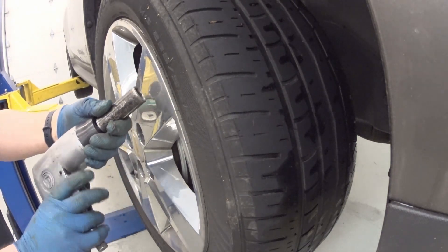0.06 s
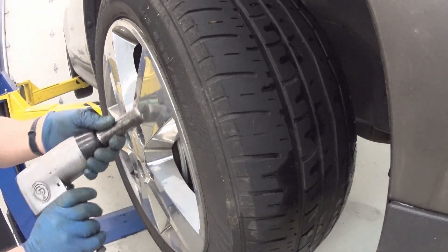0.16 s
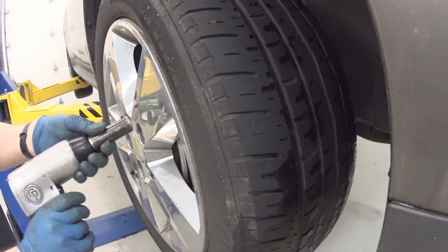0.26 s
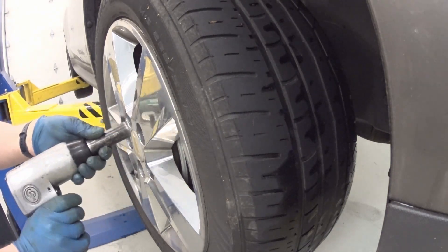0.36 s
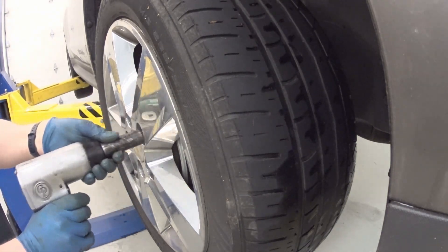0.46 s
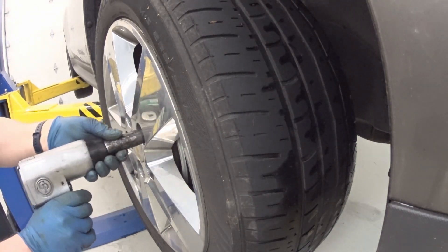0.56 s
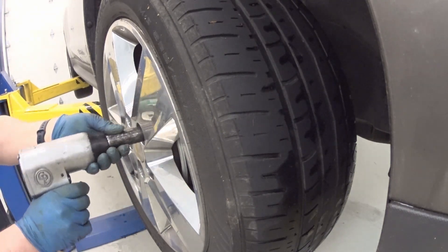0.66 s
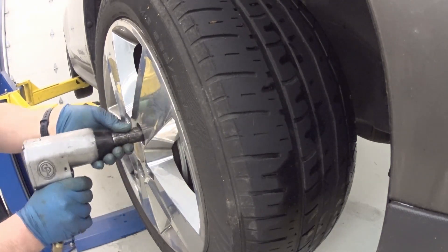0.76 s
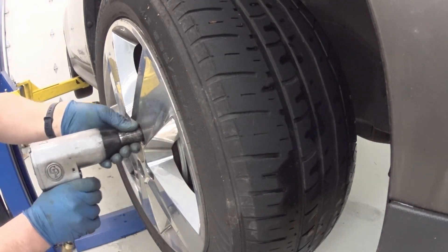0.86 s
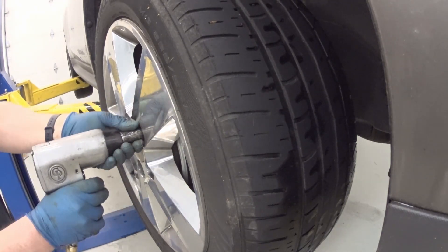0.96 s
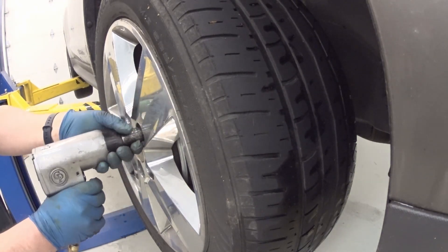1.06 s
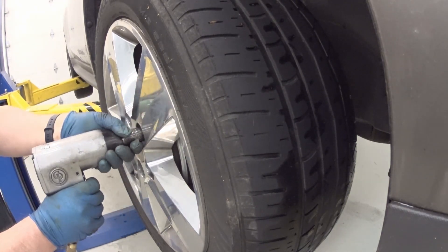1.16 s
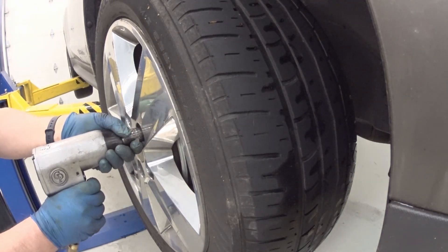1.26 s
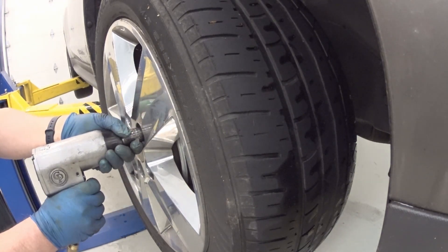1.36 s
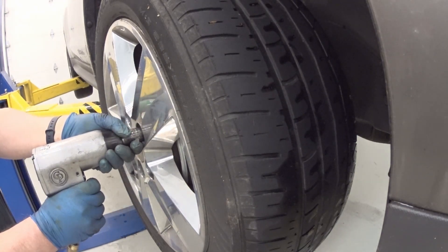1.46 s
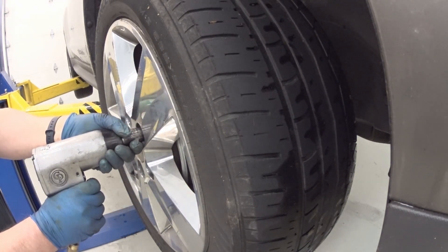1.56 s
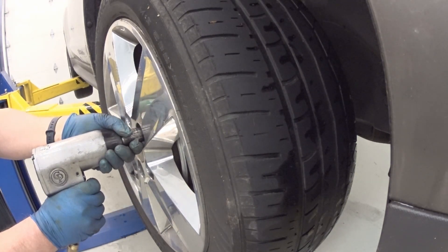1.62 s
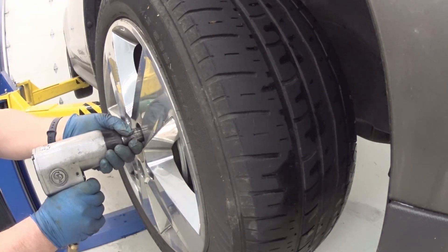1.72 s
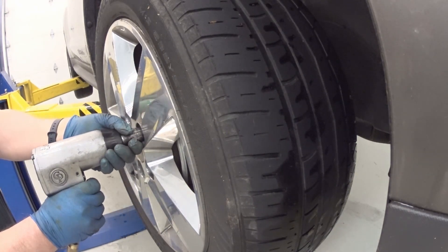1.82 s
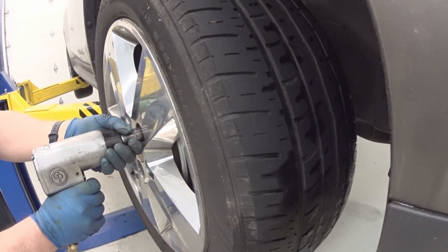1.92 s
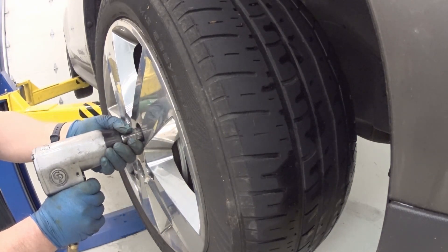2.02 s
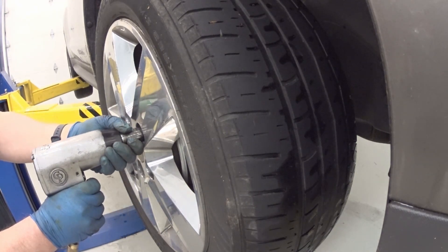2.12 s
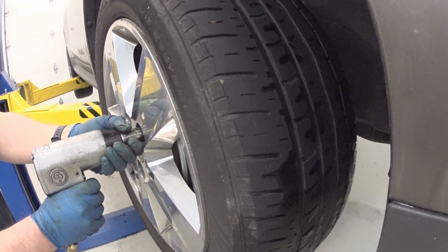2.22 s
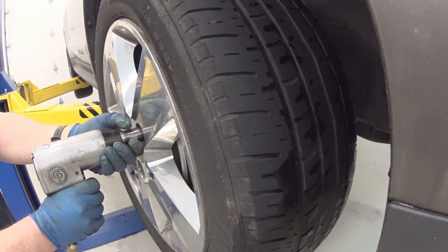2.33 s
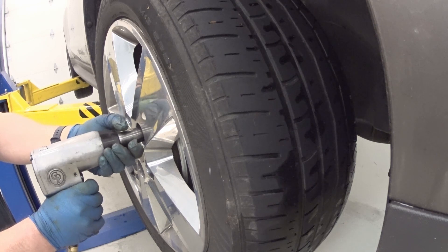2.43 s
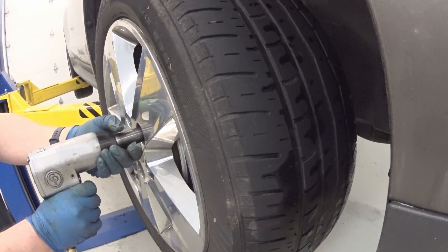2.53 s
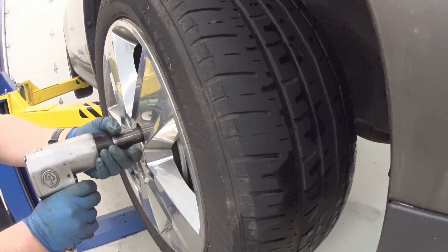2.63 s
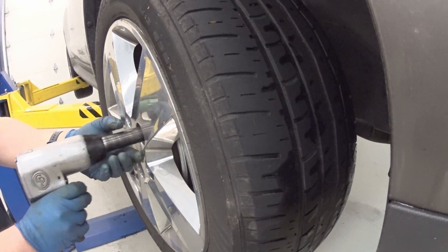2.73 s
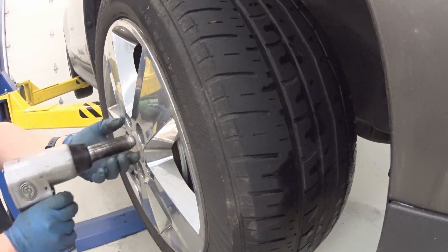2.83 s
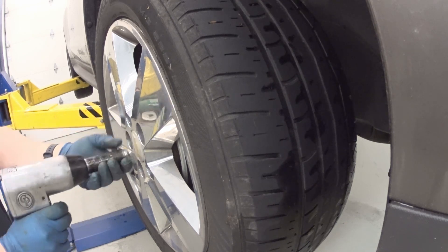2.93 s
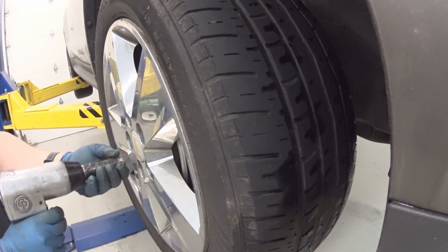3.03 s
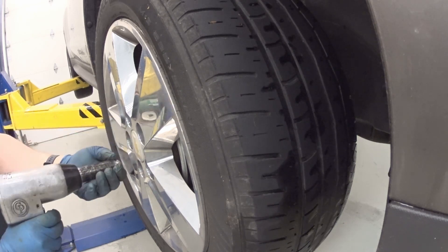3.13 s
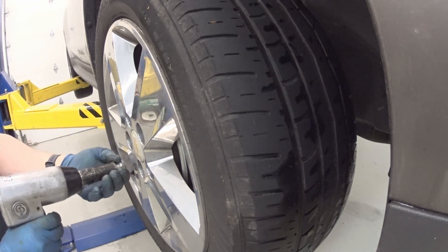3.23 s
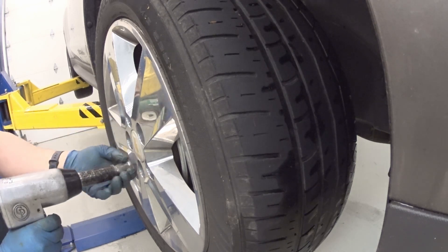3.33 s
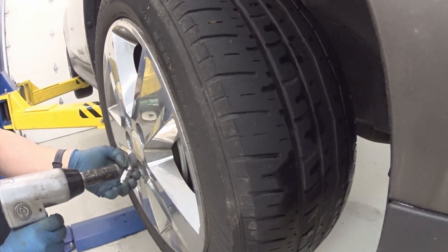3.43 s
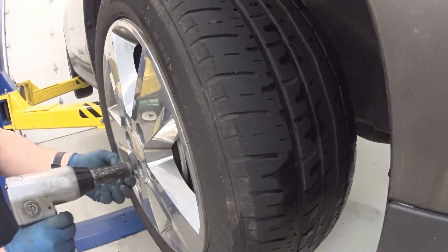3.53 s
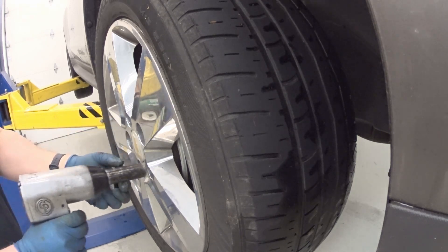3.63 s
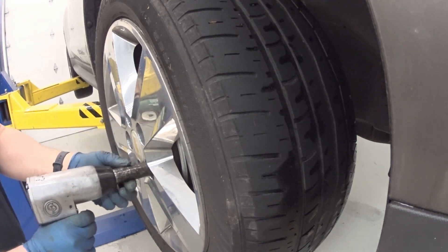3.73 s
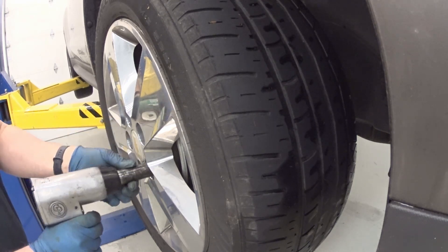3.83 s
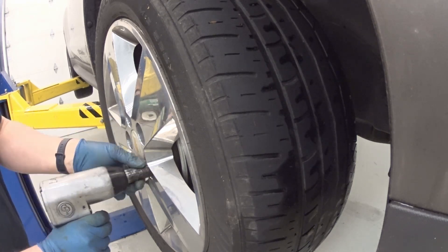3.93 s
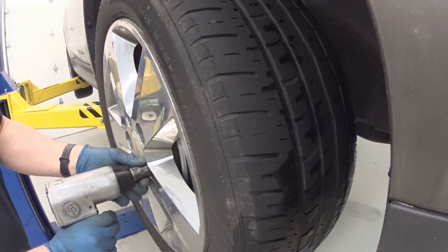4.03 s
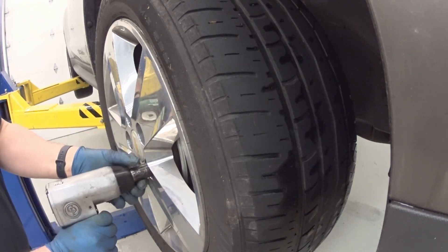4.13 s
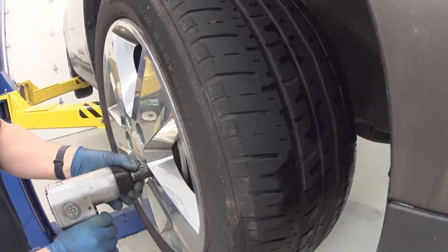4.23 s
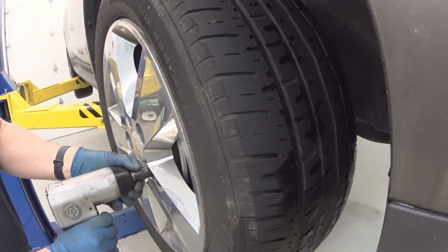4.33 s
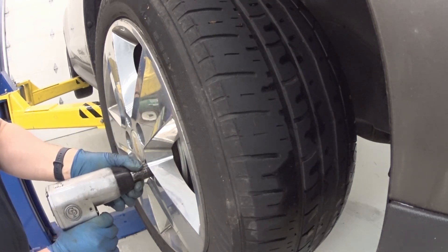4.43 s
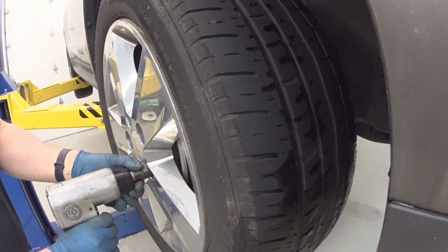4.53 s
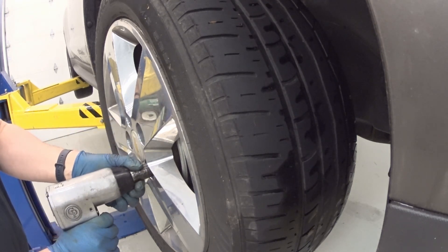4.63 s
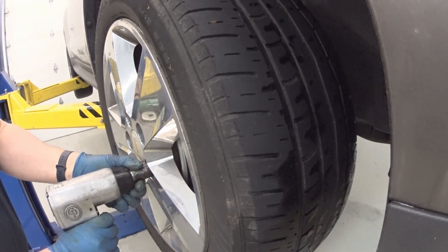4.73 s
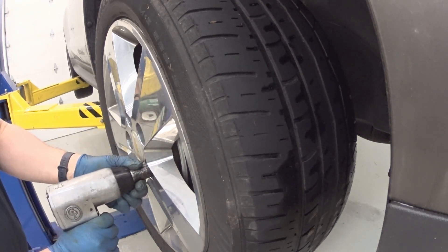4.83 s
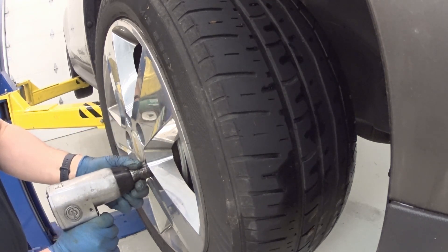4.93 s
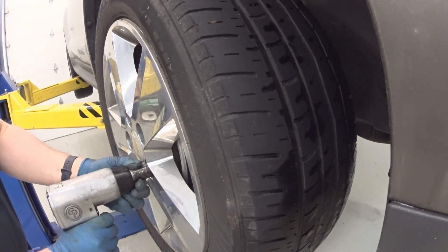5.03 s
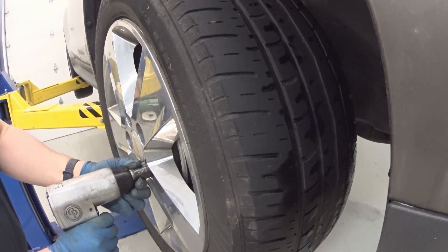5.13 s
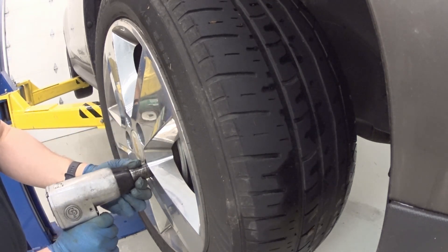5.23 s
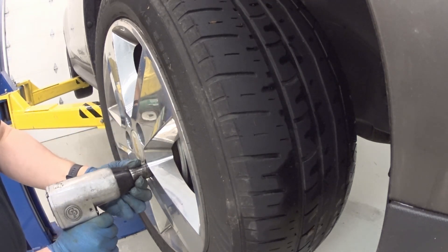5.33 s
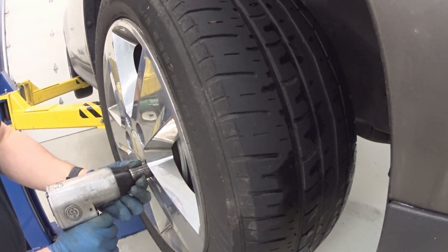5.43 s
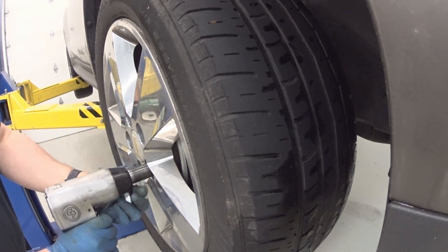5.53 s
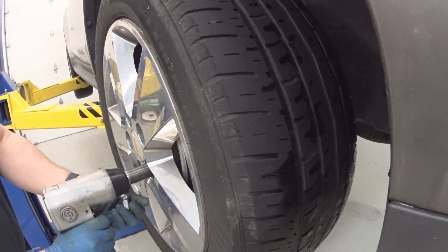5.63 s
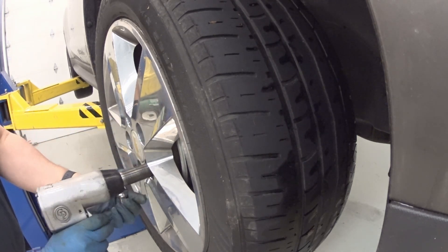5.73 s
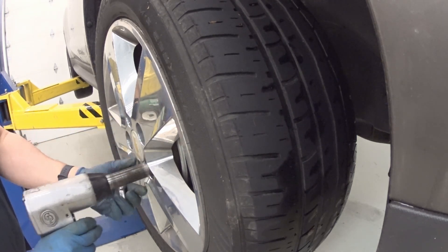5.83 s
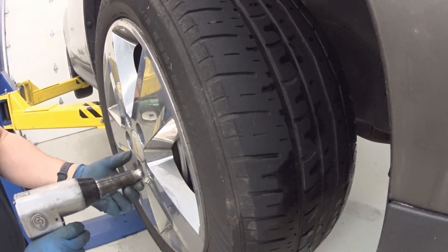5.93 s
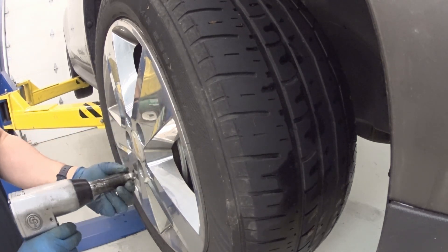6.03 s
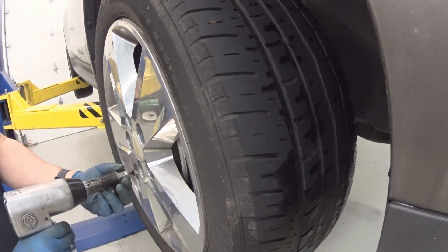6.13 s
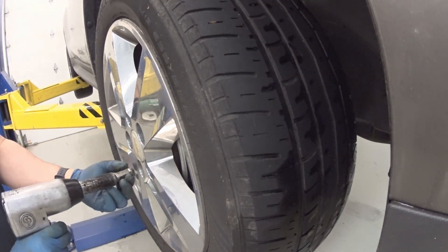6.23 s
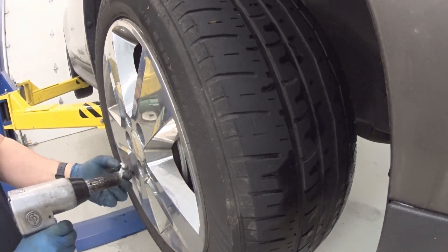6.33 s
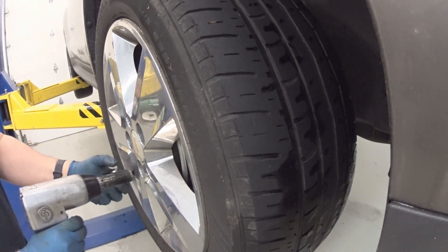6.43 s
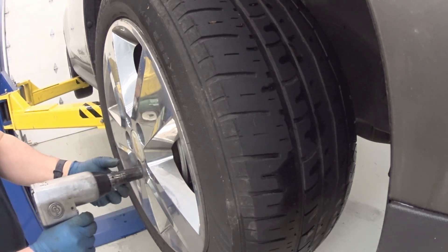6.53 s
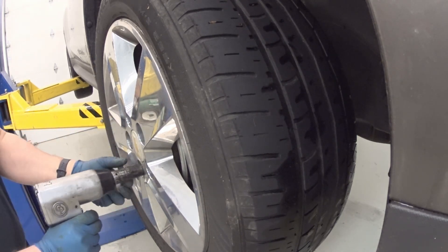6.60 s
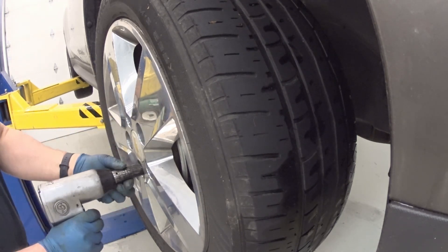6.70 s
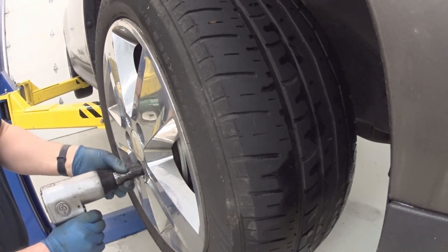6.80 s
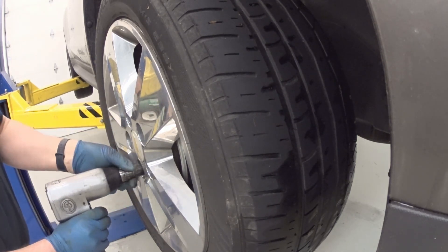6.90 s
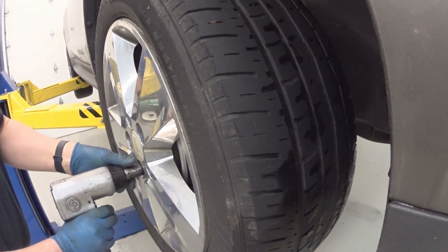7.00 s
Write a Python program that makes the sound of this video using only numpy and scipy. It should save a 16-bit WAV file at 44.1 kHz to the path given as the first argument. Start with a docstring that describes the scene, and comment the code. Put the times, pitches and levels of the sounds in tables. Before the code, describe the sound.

A close stereo microphone catches an air impact wrench loosening two lug nuts. Faint shop noise fades after a boomy metallic rattle of socket on wheel. About fifteen hard blows a second chatter over pulsing exhaust air, then the freed motor revs, whirls the nut and coasts down. Light clinks lead to the second burst, ending with distant machine noise, last knocks and garage echoes.

```python
"""An air impact wrench takes two lug nuts off a car wheel in a reverberant garage.
Shop noise ebbs, swells during the first clatter of the socket, which knocks the wheel's modes and boom,
then dies away. Blows of a stalling vane motor follow, with jets and puffs of exhaust; freed, it revs up,
whirls the nut and winds down. Clatter, blows and winding down come again for the second nut; a machine of
filtered noise and wavering tones starts up across the garage, and the socket knocks a few last times."""
import sys
import numpy as np
from scipy import signal
from scipy.fft import rfft, irfft, next_fast_len
from scipy.io import wavfile

SR = 44100
rng = np.random.default_rng(int(sys.argv[2]) if len(sys.argv) > 2 else 0)


def unload_wav(signal):
    """Save mono or channel-first audio to the path in sys.argv[1] as 16-bit WAV at rate SR, clipped to [-1, 1]."""
    wavfile.write(
        sys.argv[1],
        SR,
        np.round(np.clip(np.atleast_2d(signal).T, -1, 1) * 32767).astype(np.int16),
    )


N = 311346
TIME = np.arange(N) / SR

# Level of the shop noise. Each row: time in seconds, level in dB.
SHOP_LEVEL = [(0, -58), (.3, -60), (.53, -64), (.8, -56), (1.1, -76.5), (1.5, -110)]
# Spectrum of the shop noise. Each row: frequency in Hz, relative density in dB per Hz.
SHOP_SPECTRUM = [(35, -60.5), (60, -36), (272, -10), (403, -8.5), (1080, -11.5), (1280, -14), (1430, -13),
                 (3510, -22.5), (4980, -21.5), (10500, -28.5), (11200, -33.5), (14600, -64), (22000, -120)]
# Level of the machine across the garage. Each row: time in seconds, level in dB.
MACHINE_LEVEL = [(5.6, -110), (5.85, -55.5), (6.15, -59.5), (6.5, -57.5), (7.06, -56.5)]
# Spectrum of its hiss. Each row: frequency in Hz, relative density in dB per Hz.
MACHINE_SPECTRUM = [(76, -47), (130, -9.5), (157, -15), (254, -8.5), (383, -5), (445, 0), (498, -7),
                    (578, -2), (839, -6.5), (974, -0.5), (1500, -6.5), (2980, -3.5), (4410, -6.5),
                    (7710, -9), (11200, -22.5), (14600, -50.5), (22000, -120)]
# Its tones. Each row: mean frequency in Hz, relative level in dB.
HUM_TONES = [(121, -85.5), (248, -79.5), (270, -85), (350, -93), (452, -74), (522, -83), (764, -71),
             (1012, -88), (2945, -73), (3068, -70.5), (7445, -71.5)]
# Spectrum of the quiet room. Each row: frequency in Hz, relative density in dB per Hz.
ROOM_SPECTRUM = [(24, -39), (40, -14.5), (150, -7.5), (334, -0.5), (661, -5), (1010, -5.5), (1090, -6.5),
                 (11200, -23), (14600, -49.5), (22000, -120)]
# Decay of the garage. Each row: frequency in Hz, t60 in seconds.
GARAGE_T60 = [(100, 0.66), (500, 0.61), (1200, 0.95), (3000, 1.3), (6000, 1), (11000, 0.36)]
# Strength of its echoes. Each row: frequency in Hz, level in dB.
ECHO_LEVEL = [(120, -10), (400, -4.5), (1200, -5.5), (3000, -4), (9000, -14)]

# Socket knocking on nut and wheel. Each row: start in seconds, then relative levels of boom, thud,
# clack, tick and ring in dB, ring centre in Hz, t60 of rattle and ring in seconds.
SOCKET_KNOCKS = [(0.548, -18, -15.5, -22.5, -25, -35, 1380, 0.063),
                 (0.5545, -29.5, -20, -23.5, -36, -22, 1330, 0.14),
                 (0.5594, -30, -15.5, -24, -27, -21.5, 2200, 0.1),
                 (0.5836, -40, -42, -27, -25, -29, 6600, 0.039),
                 (0.624, -37, -36, -33.5, -44, -29, 2150, 0.097),
                 (0.684, -39, -50, -43, -54, -42, 2000, 0.06),
                 (0.7068, -32.5, -26, -21, -30.5, -26, 3130, 0.044),
                 (0.735, -46, -48, -54, -47, -37, 1930, .05),
                 (0.7698, -41.5, -47, -39, -48, -39, 3200, 0.032),
                 (0.7955, -62, -36.5, -46, -62, -41, 2330, .04),
                 (0.801, -49, -50, -33, -38.5, -27.5, 3850, 0.054),
                 (0.8438, -66, -59, -53, -38, -33.5, 3500, 0.028),
                 (0.946, -59, -44, -53, -54.5, -42, 2880, 0.032),
                 (3.387, -84, -76.5, -72.5, -69, -79.5, 3590, .03),
                 (3.7623, -58, -40, -39.5, -35.5, -37, 2270, 0.09),
                 (3.7859, -68, -44, -48, -39.5, -46, 3600, 0.061),
                 (3.822, -67, -47.5, -43.5, -50, -46.5, 1450, 0.14),
                 (3.84, -69, -50, -54, -46, -50, 2080, .04),
                 (3.8491, -62, -38.5, -38, -43.5, -42, 3770, 0.12),
                 (3.884, -67, -56, -55, -53, -60, 2420, 0.073),
                 (3.913, -55.5, -51, -53, -63, -52, 2350, .04),
                 (3.957, -62, -60, -52, -70, -50, 1650, .025),
                 (3.991, -66, -52.5, -47, -48.5, -57, 3630, .02),
                 (4.039, -56.5, -46, -41, -46.5, -38.5, 4060, 0.021),
                 (4.097, -61, -55, -58, -69, -67, 2160, .08),
                 (6.64, -43, -40.5, -50, -68, -44, 1680, 0.099),
                 (6.65, -48, -43.5, -56, -69, -42, 960, .08), (6.715, -61, -60, -43.5, -49, -48, 4000, .06),
                 (6.724, -58, -44, -41.5, -44.5, -47, 2290, .06),
                 (6.753, -66, -52, -45, -54, -47, 3960, .02),
                 (7.029, -46, -47.5, -42, -49, -43, 1480, 0.095)]
# Modes of socket and wheel. Each row: mean frequency in Hz, mean relative level in dB, t60 in seconds.
WHEEL_MODES = [(505, -1, .04), (635, 1, .05), (802, -2, .04), (880, -6, .04), (1030, -5, .03),
               (1156, -2, .03), (1303, 0, .05), (1432, 1, .05), (1743, -1, .04), (1900, -1, .08),
               (2193, 4, .03), (2590, -3, .025), (3192, -3, .025), (3640, -1, .04), (4300, -4, .015),
               (6687, 1, .03), (7200, -4, .025)]
# Bands of thud, clack and tick. Each row: low edge in Hz, high edge in Hz.
THUD_CLACK_TICK_BANDS = [(500, 1850), (1950, 4500), (5600, 7600)]

# Whine of the whirling nut. Each row: frequency in Hz, relative density in dB per Hz.
WHINE_SPECTRUM = [(60, -47), (200, -4.5), (400, -13), (780, -2.5), (1200, 5.5), (1450, 2.5), (1800, -2),
                  (2400, -10), (3500, -23), (8000, -41)]
# Scrape of the nut whirling in the socket. Each row: frequency in Hz, relative density in dB per Hz.
SCRAPE_SPECTRUM = [(300, -55), (700, -9.5), (900, -3), (1250, -11), (1450, -4), (1700, -1), (2300, -4),
                   (3500, -0.5), (8000, -23)]
# Freed motor, one list per nut. Each row: time in seconds, mean vane rate in Hz, relative whirl level in dB.
FREE_RUN_CURVES = [
    [(2.37, 140.4, -62), (2.42, 244.5, -55.5), (2.46, 292.2, -55.5), (2.5, 360.7, -49), (2.58, 424, -55),
     (2.635, 437, -54), (2.69, 352, -54.5), (2.706, 279.4, -61.5), (2.775, 218.6, -53), (3.05, 25.7, -100)],
    [(5.419, 100, -75), (5.5, 200, -54.5), (5.57, 288, -51.5), (5.615, 348, -49.5), (5.655, 386, -51.5),
     (5.742, 430, -62.5), (5.775, 355, -63), (5.812, 295, -59), (5.826, 246, -66), (5.87, 198, -66),
     (6.2, 15, -100)],
]

# Spectrum of a hammer blow. Each row: frequency in Hz, relative density in dB per Hz.
BLOW_SPECTRUM = [(200, -23), (600, 1.5), (1300, 5), (2300, 2), (3500, 4), (5000, 4.5), (8000, 8.5),
                 (11000, -2)]
# Blows on each nut; they go on, quicker, while the loosened nut snags.
# Each row: time in seconds, relative clack level in dB, relative ring level in dB, ring centre in Hz.
FIRST_NUT_BLOWS = [(1.2099, -36.5, -49.5, 2200), (1.2744, -42, -51, 2260), (1.3423, -37, -51, 2120),
                   (1.4087, -38, -55, 2250), (1.4751, -40, -53, 2140), (1.5396, -37.0, -52.5, 2300),
                   (1.6013, -35.5, -49.5, 2230), (1.6621, -40, -57.0, 2260), (1.7216, -35, -55, 3610),
                   (1.7806, -36, -50, 3400), (1.8398, -32.5, -49, 2400), (1.8987, -39, -52, 2380),
                   (1.9586, -36, -52.5, 2400), (2.018, -34.5, -54, 2560), (2.0778, -36.5, -53, 2400),
                   (2.1386, -35.5, -56, 2260), (2.1996, -38, -59.5, 2160), (2.2593, -35, -55.5, 2260),
                   (2.3164, -36, -52, 3150), (2.3702, -35.5, -60, 2860), (2.3984, -40.5, -53, 2280),
                   (2.4322, -40.5, -51.5, 3410), (2.4762, -38, -56, 2400), (2.518, -39, -53.0, 2160),
                   (2.5562, -36, -49, 2370), (2.5983, -36, -51.5, 2400), (2.6412, -37.5, -63, 2260),
                   (2.6971, -40, -51.5, 2260)]
SECOND_NUT_BLOWS = [(4.2248, -45, -53.5, 1840), (4.287, -39, -51.5, 2240), (4.3543, -41, -49, 2240),
                    (4.423, -44, -51.0, 4360), (4.487, -37.5, -53.5, 2260), (4.5526, -47, -53.5, 4060),
                    (4.6155, -35, -54, 2380), (4.6818, -45, -53, 4030), (4.7447, -36.5, -55, 2860),
                    (4.8096, -38, -58, 3610), (4.8715, -37, -49.5, 3830), (4.9353, -36, -57, 3210),
                    (4.9961, -40, -59, 4060), (5.0588, -41, -67, 3610), (5.1202, -38.5, -58, 4300),
                    (5.1838, -35.5, -69, 2010), (5.246, -36.5, -64, 2010), (5.3067, -37, -62, 2030),
                    (5.363, -35.5, -60, 2010), (5.4201, -36, -55, 2500), (5.4752, -37, -59, 2400),
                    (5.5128, -38, -62, 2550), (5.545, -40, -65, 2260), (5.5841, -35, -56.5, 2700),
                    (5.6274, -34.5, -54, 3410), (5.669, -34, -56.5, 3610), (5.7094, -43, -60, 2400),
                    (5.7531, -43, -60, 3410), (5.8185, -38.5, -61, 2540)]

# Spectrum of the leaking exhaust. Each row: frequency in Hz, relative density in dB per Hz.
HISS_SPECTRUM = [(25, -28), (80, -25), (200, -10), (500, -8), (750, -8.5), (1300, 1), (2200, -3.5),
                 (3200, 2), (4900, 2.5), (6000, 1), (7200, 2.5), (8500, -2), (10200, -5), (11200, -13.5)]
# Spectrum of the jet as a vane clears the port. Each row: frequency in Hz, relative density in dB per Hz.
JET_SPECTRUM = [(100, -46), (600, -10.5), (1300, 0.5), (2500, -9), (4500, 1), (6000, 0), (7400, 3.5),
                (9000, 0), (10200, -2), (11200, -12)]
# Spectrum of a vane's pressure puff. Each row: frequency in Hz, relative density in dB per Hz.
PUFF_SPECTRUM = [(40, -40.5), (90, -13), (150, -5), (230, 2), (330, 8.5), (420, 1.5), (520, 12), (650, 2),
                 (830, 5), (1000, -2), (1300, -1), (1800, -12.5), (4000, -40)]
# Trigger pulls, one per nut. Each row: press in seconds, release in seconds, relative exhaust level in dB,
# opening surge in dB, jet strength in dB, exponent of the first turn's pickup (higher is later),
# lead of the chug before a blow in seconds.
TRIGGER_PULLS = [(1.136, 2.637, -43.5, 6, 1.5, 3.3, 0.014), (4.165, 5.743, -44, 2.5, 3, 2.9, 0.013)]
# Colour of the exhaust under the hand round the port, one list per nut.
# Each row: frequency in Hz, relative gain in dB.
GRIP_COLOURS = [
    [(600, 0.5), (1200, -1.5), (2300, 2), (3200, 2.5), (4500, -2), (6000, 2.5), (7400, 0), (10000, 0.5)],
    [(600, 0.5), (1200, 0), (2300, 1.5), (3200, 1), (4500, -1), (6000, 1), (7400, 2.5), (10000, 1)],
]
# Jets of the six unevenly sealing vanes. Each row: one nut's relative levels in dB, in order of a turn.
VANE_JET_LEVELS = [
    [-2, 1, -4, 2, 3.1, -4],
    [-11.5, 1.8, 0, -3.5, 1.1, -2],
]

TOP_CUT_HZ = 11100

# boom: pitches before a small random detuning, time constant of the fall
BOOM_START_HZ, BOOM_END_HZ, BOOM_SAG_S, BOOM_ATTACK_S, BOOM_T60_S = 548, 483, 0.02, 0.0025, 0.08
# faint after-ring of the rim
LINGER_DB, LINGER_T60_S = -27, .45
# weak answer between the wheel's two groups of modes
GAP_LOW_HZ, GAP_HIGH_HZ, GAP_LOSS_SHARE = 720, 1100, .35

# each snag brakes the whirling nut; lag is where in the cycle it is faintest
SNAG_SWING_SHARE, SNAG_DEPTH_SHARE, SNAG_LAG_CYCLES = .07, 1, 0.12

# pop of air behind the recoiling rotor
RECOIL_DELAY_S, RECOIL_HZ, RECOIL_DB, RECOIL_T60_S = 0.01217, 526, -53, 0.019
# blows that stall the rotor before the nut comes loose
TIGHT_BLOWS = 20

# six-vane rotor: exponent of the last tight turn, share of a vane's pass from the last jet to the blow
LAST_PICKUP, PORT_LEAD_VANES = 1.85, .65
WAVER_SHARE = .028  # spread of the freed motor's rate

# air supply: valve opens, hose pressure is spent, line sags, valve shuts
VALVE_S, SURGE_S, SAG_DB_PER_S, SHUT_DB_PER_S = 0.015, 0.018, 2.5, 93
# puffs under load, relative level; loss at top speed
LOADED_DB, LOAD_S, UNLOADED_DB, TOP_VANE_HZ = -50, 0.062, -7.5, 477.8
# coasting rotor pumps air, relative level; drop at the last snag, fall after it
PUMP_DB, PUMP_ATTACK_S, BRAKED_DB, PUMP_FALL_DB_PER_S = -47.5, 0.052, -5, 87
# rotor jams just before a blow and the exhaust catches
CATCH_LEAD_S, CATCH_S, CATCH_DB = 0.00067, 0.0011, -16
# stalled rotor blocks the air after a blow
STALL_LAG_S, STALL_S, STALL_DB = 0.014, 0.013, -2
# chug as the motor winds up to a blow
CHUG_S, CHUG_DB = 0.0063, 4.5


def from_db(db):
    """Decibels to gain."""
    return 10 ** (np.asarray(db) / 20)


def rms_one(x):
    """Scale to unit power."""
    return x / np.sqrt(np.mean(x ** 2) + 1e-20)


def level(rows):
    """Gain over time from rows of time, .., dB; -200 dB outside them."""
    rows = np.array(rows)
    return from_db(np.interp(TIME, rows[:, 0], rows[:, -1], left=-200, right=-200))


def at_hz(points, hz):
    """Read a table on a log-frequency axis."""
    points = np.array(points)
    return np.interp(np.log(hz + 1e-3), np.log(points[:, 0]), points[:, 1])


def colour(x, spectrum):
    """Give x a spectrum; white noise keeps its power."""
    gain = from_db(at_hz(spectrum, np.fft.rfftfreq(N, 1 / SR)))
    return irfft(rfft(x) * rms_one(gain), N)


def band(x, low_hz, high_hz):
    """Causal band-pass."""
    edges_hz = [low_hz, min(high_hz, .45 * SR)]
    return signal.sosfilt(signal.butter(2, edges_hz, "band", fs=SR, output="sos"), x)


def drift(rate_hz):
    """Random wander of unit rms, straight between knots."""
    knots = rng.standard_normal(4000)
    return rms_one(np.interp(TIME * rate_hz, np.arange(len(knots)), knots))


def noise(apart_db):
    """Stereo white noise: a common part plus a separate part per side at apart_db."""
    return rng.standard_normal(N) + from_db(apart_db) * rng.standard_normal((2, N))


def add(track, s, sound):
    """Mix a short sound in at a time."""
    start = max(round(s * SR), 0)
    track[start:start + len(sound)] += sound[:max(N - start, 0)]


def since(s):
    """Seconds gone by after a moment; zero before it."""
    return np.maximum(TIME - s, 0)


def dips(moments, width_s, depth_db):
    """Gain that sinks briefly around each moment, or swells if depth_db is positive."""
    nearest = moments[np.searchsorted((moments[1:] + moments[:-1]) / 2, TIME)]
    distance = np.minimum(np.abs(TIME - nearest) / width_s, 10)
    return from_db(depth_db * np.exp(-distance ** 2))


def background(still_db=-90, tones_db=-1.0):
    """Shop noise, the machine's hiss and hum, and the quiet room."""
    shop = level(SHOP_LEVEL) * colour(noise(apart_db=-14.0), SHOP_SPECTRUM)
    running = level(MACHINE_LEVEL)
    hum = 0
    for hz, db in HUM_TONES:
        gain = from_db(db + tones_db + 2.1 * drift(8.7))
        cycles = np.cumsum(hz * (1 + 0.00514 * drift(40))) / SR
        hum = hum + gain * np.sin(2 * np.pi * cycles)
    hiss = running * colour(noise(apart_db=-9.5), MACHINE_SPECTRUM)
    machine = hiss + np.sqrt(2) * hum * running / running.max()
    return shop + machine + from_db(still_db) * colour(noise(apart_db=-2.0), ROOM_SPECTRUM)


def garage(x, build_s=0.002):
    """Diffuse echoes build up quickly and die soonest in the treble."""
    age = TIME[:3 * SR // 2]
    edges_hz = np.geomspace(50, 12800, 9)
    tail = 0
    for low_hz, high_hz in zip(edges_hz, edges_hz[1:]):
        hz = np.sqrt(low_hz * high_hz)
        t60_s = at_hz(GARAGE_T60, hz)
        # longer decays start lower, for equal energy
        gain = from_db(at_hz(ECHO_LEVEL, hz)) * np.sqrt(np.log(1e6) / (t60_s * SR))
        echoes = band(noise(apart_db=-7.0)[:, :len(age)], low_hz, high_hz)
        tail = tail + gain * echoes * from_db(-60 * age / t60_s)
    return signal.fftconvolve(x, tail * (1 - np.exp(-age / build_s)), axes=1)[:, :N]


def dying(age, t60_s):
    """A quick decay plus the rim's faint after-ring."""
    return from_db(-60 * age / t60_s) + from_db(LINGER_DB - 60 * age / LINGER_T60_S)


def boom(age):
    """The wheel's hollow note, sinking in pitch as the socket seats."""
    hz = BOOM_END_HZ + (BOOM_START_HZ - BOOM_END_HZ) * np.exp(-age / BOOM_SAG_S)
    hz = hz * (1 + .015 * rng.standard_normal())
    envelope = (1 - np.exp(-age / BOOM_ATTACK_S)) * dying(age, BOOM_T60_S)
    return np.sqrt(2) * envelope * np.sin(2 * np.pi * np.cumsum(hz) / SR)


def socket(rattle_db=7, knock_db=-11.0, boom_db=-4, thump_db=-47, snap_db=6):
    """Each knock cracks, rattles and rings the steel at its own pitch; blunt ones boom and thump the tyre."""
    crack_db, crack_t60_s, ring_width = 19, .009, 1.13
    out, age = np.zeros(N), TIME[:SR // 2]
    hz, mode_db, mode_t60_s = np.transpose(WHEEL_MODES)[:, :, None]
    for s, hollow_db, thud_db, clack_db, tick_db, ring_db, ring_hz, ring_t60_s in SOCKET_KNOCKS:
        sign = rng.choice([-1, 1], hz.shape)
        strength = sign * from_db(mode_db + 2 * rng.standard_normal(hz.shape))
        # hand and contact pressure detune the modes a little
        detune = 1 + .008 * rng.standard_normal(hz.shape)
        modes = strength * dying(age, mode_t60_s) * np.sin(2 * np.pi * hz * detune * age)
        crack = from_db(-60 * age / crack_t60_s)
        rattle = from_db(-60 * age / ring_t60_s)
        contact = from_db(crack_db) * crack + from_db(rattle_db) * rattle
        knock = np.sum(modes, axis=0) + contact * rng.standard_normal(len(age))
        knock = knock - GAP_LOSS_SHARE * band(knock, GAP_LOW_HZ, GAP_HIGH_HZ)
        snap = (rattle + from_db(snap_db) * crack) * rng.standard_normal(len(age))
        ring = band(snap, ring_hz / ring_width, ring_hz * ring_width)
        parts = [band(knock, *edges_hz) for edges_hz in THUD_CLACK_TICK_BANDS] + [ring]
        for db, part in zip([thud_db, clack_db, tick_db, ring_db], parts):
            add(out, s, from_db(db + knock_db) * part / np.std(part[:SR // 100]))
        thump = band(knock, 30, 300)
        add(out, s, from_db(hollow_db + thump_db) * thump / np.std(thump[:SR // 50]))
        add(out, s, from_db(hollow_db + boom_db) * boom(age))
    return out


def snags(moments):
    """Speed factor and pulsing of the whirl: each snag brakes and mutes it, then it picks up again."""
    phase = np.interp(TIME, moments, np.arange(len(moments))) % 1
    driven = (TIME > moments[0]) & (TIME < moments[-1])
    braking = 1 + driven * SNAG_SWING_SHARE * (phase - .5)
    pulsing = 1 - driven * SNAG_DEPTH_SHARE * np.cos(2 * np.pi * (phase - SNAG_LAG_CYCLES))
    return braking, pulsing


def loose_nut(vanes, drive, pulsing, whine_db=-2.0, scrape_db=-2.5, lurch_db=2.5):
    """Driven round by the freed motor, the loose nut whines in bursts at the vane rate and scrapes."""
    passes = np.diff(np.floor(vanes), prepend=0)
    chatter = 10 * passes * pulsing * from_db(lurch_db * drift(160))
    turning = 1 + .6 * np.sin(2 * np.pi * vanes / 6)
    scrape = noise(apart_db=-25) * np.sqrt(np.abs(pulsing)) * turning
    whine = from_db(whine_db) * colour(drive * chatter, WHINE_SPECTRUM)
    return whine + from_db(scrape_db) * colour(drive * scrape, SCRAPE_SPECTRUM)


def hammer(blows, t60_s=0.02, rebound_s=0.0051, rebound_db=-9, ring_t60_s=0.038, ring_gain_db=2.0):
    """Hammer clacks on the anvil and rebounds once; the anvil rings; the rotor recoils from tight blows."""
    ring_width = 1.12
    strikes, rings, age = np.zeros(N), np.zeros(N), TIME[:SR // 10]
    pop = from_db(RECOIL_DB - 60 * age / RECOIL_T60_S) * np.sin(2 * np.pi * RECOIL_HZ * age)
    for s, clack_db, ring_db, ring_hz in blows:
        clack = from_db(clack_db - 60 * age / t60_s)
        add(strikes, s, clack)
        add(strikes, s + rebound_s, from_db(rebound_db) * clack)
        rattle = from_db(-60 * age / ring_t60_s) * rng.standard_normal(len(age))
        ring = band(rattle, ring_hz / ring_width, ring_hz * ring_width)
        add(rings, s, from_db(ring_db + ring_gain_db) * ring / np.std(ring[:SR // 80]))
    for s in blows[:TIGHT_BLOWS, 0]:
        add(rings, s + RECOIL_DELAY_S, pop)
    return colour(strikes * noise(apart_db=-45.0), BLOW_SPECTRUM) + rings


def rotor(stalls, free_hz, pickup):
    """Vanes passed so far: each blow stalls the rotor, which regathers speed over a turn, then runs free."""
    turns = np.interp(TIME, stalls, np.arange(len(stalls)))
    turn = turns.astype(int)
    exponents = np.linspace(pickup, LAST_PICKUP, len(stalls))
    exponents = exponents * np.exp(.04 * rng.standard_normal(len(stalls)))
    hammering = 6 * (turn + (turns - turn) ** exponents[turn])
    running_free = np.cumsum(free_hz * (1 + WAVER_SHARE * drift(500))) / SR
    return PORT_LEAD_VANES + hammering + running_free


def air_flow(pressed_s, released_s, db, surge_db):
    """Exhaust gain: a surge as the valve opens, a slow sag, a quick fall on release."""
    valve = np.clip(since(pressed_s) / VALVE_S, 0, 1) ** 2
    surge = surge_db * np.exp(-(since(pressed_s + VALVE_S) / SURGE_S) ** 2)
    fall = SAG_DB_PER_S * since(pressed_s) + SHUT_DB_PER_S * since(released_s)
    return valve * from_db(db + surge - fall)


def puff_strength(pressed_s, released_s, braked_s, free_hz):
    """Puffs build up under load, weaken as the motor runs free, and swell as it coasts to the last snag."""
    build = 1 - np.exp(-since(pressed_s) / LOAD_S)
    load = build * from_db(LOADED_DB + UNLOADED_DB * free_hz / TOP_VANE_HZ)
    pump = from_db(PUMP_DB + BRAKED_DB * (TIME > braked_s) - PUMP_FALL_DB_PER_S * since(braked_s))
    shut = np.clip(since(released_s) / PUMP_ATTACK_S, 0, 1) ** 2
    return (1 - shut) * load + shut * pump


def exhaust(vanes, air, push, jet_db, vanes_db, leak=0.72, burst=1.375, burst_s=0.0036,
            flutter_db=2.5, puff_db=18.5, uneven_db=1.0, full_hz=180):
    """Every vane that clears the port lets out a bright jet, and a puff that grows with rotor speed."""
    opens = np.diff(np.floor(vanes), prepend=0) * from_db(uneven_db * rng.standard_normal(N))
    speed = np.clip(np.diff(vanes, append=vanes[-1]) * SR / full_hz, 0, 1)
    seal = from_db(vanes_db)[(vanes.astype(int) - 1) % len(vanes_db)]
    # a slow chamber has had longer to fill, so it hisses harder
    filled = opens * seal * (1 - 0.39 * speed)
    port = np.sin(np.pi * np.clip(TIME[:SR // 50] / burst_s, 0, 1) ** .6)
    # powers add where bursts overlap
    bursts = np.sqrt(np.abs(signal.fftconvolve(filled ** 2, port)[:N]))
    jets = colour(burst * bursts * noise(apart_db=-24.0), JET_SPECTRUM)
    # air also leaks steadily past the vanes
    hiss = colour(leak * from_db(flutter_db * drift(350)) * noise(apart_db=-9.0), HISS_SPECTRUM)
    puffs = colour(opens * speed ** 2.05, PUFF_SPECTRUM)
    return air * (hiss + from_db(jet_db) * jets) + from_db(puff_db) * push * puffs


def wrench():
    """Air motor, hammer and freed nut for each pull of the trigger."""
    out = 0
    nuts = zip(TRIGGER_PULLS, [FIRST_NUT_BLOWS, SECOND_NUT_BLOWS], GRIP_COLOURS, FREE_RUN_CURVES, VANE_JET_LEVELS)
    for pull, blows, grip, run, vanes_db in nuts:
        pressed_s, released_s, db, surge_db, jet_db, pickup, chug_lead_s = pull
        blows, run = np.array(blows), np.array(run)
        tight, loose = blows[:TIGHT_BLOWS, 0], blows[TIGHT_BLOWS - 1:, 0]
        catch = dips(blows[:, 0] - CATCH_LEAD_S, CATCH_S, CATCH_DB)
        stall = dips(tight + STALL_LAG_S, STALL_S, STALL_DB)
        chug = dips(tight - chug_lead_s, CHUG_S, CHUG_DB)
        air = air_flow(pressed_s, released_s, db, surge_db) * catch * stall
        free_hz = np.interp(TIME, run[:, 0], run[:, 1], left=0, right=0)
        braking, pulsing = snags(loose)
        vanes = rotor(np.r_[pressed_s + VALVE_S, tight], free_hz * braking, pickup)
        push = puff_strength(pressed_s, released_s, loose[-1], free_hz)
        push = push * catch * np.sqrt(np.abs(pulsing)) * chug
        out = out + colour(exhaust(vanes, air, push, jet_db, vanes_db), grip)
        out = out + hammer(blows) + loose_nut(vanes, level(run) * catch, pulsing)
    return out


def scene(socket_room_db=-8.5):
    """The exhaust blows out into the garage; the socket, down in the wheel, stirs the room less."""
    tool, knocks = wrench(), socket()
    echoes = garage(tool + from_db(socket_room_db) * knocks)
    return tool + knocks + echoes + background()


def record(dry, low_hz=200, high_hz=2800):
    """Two close microphone ports lift the middle range and turn its phase apart; the top is cut."""
    size = next_fast_len(N + SR // 10)
    s = 1j * np.fft.rfftfreq(size, 1 / SR)
    left = (high_hz - s) * (low_hz + s)
    right = (high_hz + s) * (low_hz - s)
    ports = np.array([left, right]) / (s + np.sqrt(low_hz * high_hz)) ** 2
    balance = from_db([[.45], [-.45]])
    heard = irfft(rfft(dry, size) * ports, size)[:, :N] * balance
    return signal.sosfilt(signal.ellip(12, .2, 80, TOP_CUT_HZ, fs=SR, output="sos"), heard)


dry = scene()
out = record(dry)
unload_wav(out)
```